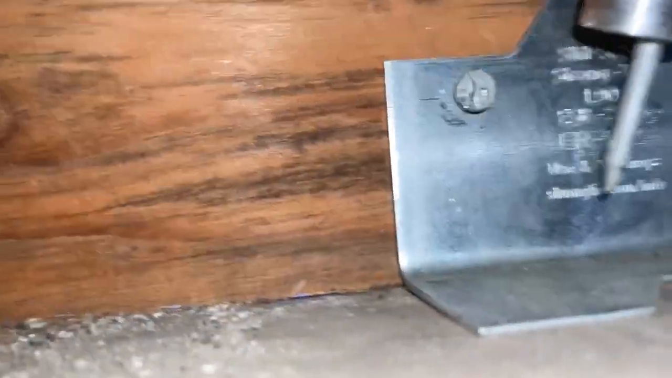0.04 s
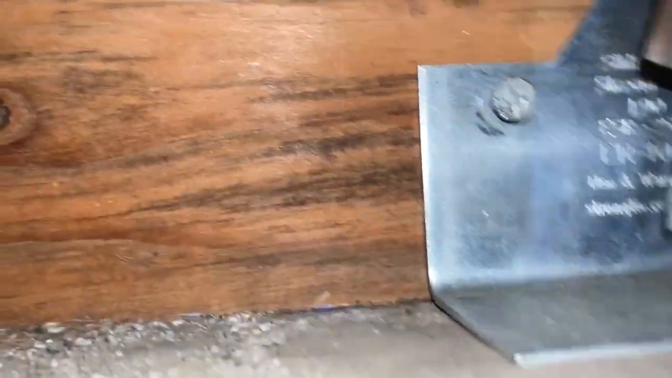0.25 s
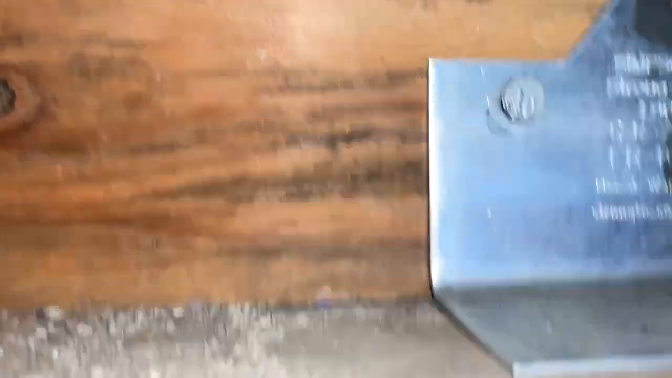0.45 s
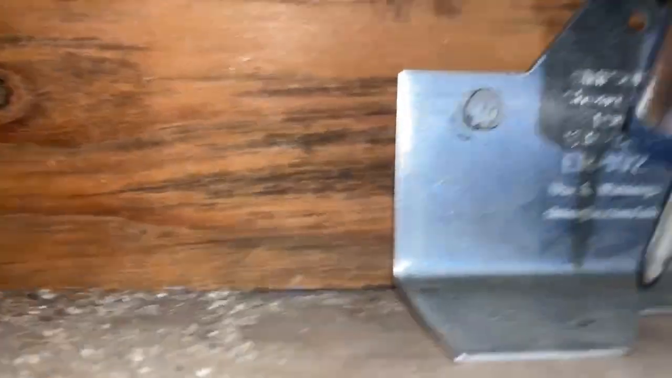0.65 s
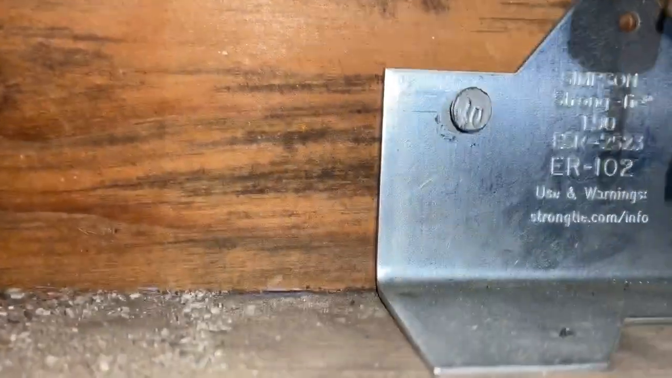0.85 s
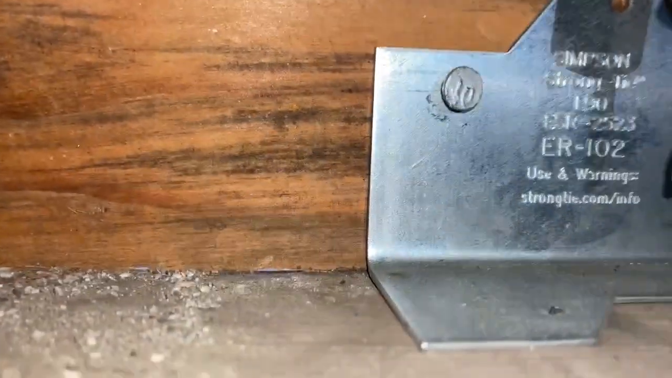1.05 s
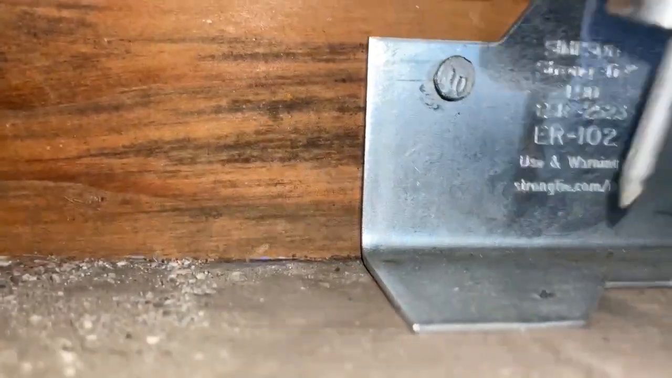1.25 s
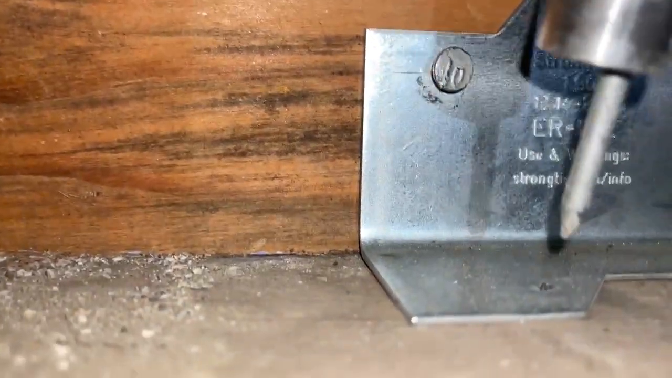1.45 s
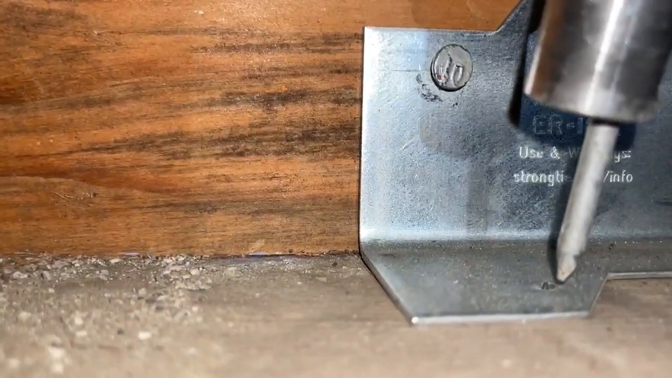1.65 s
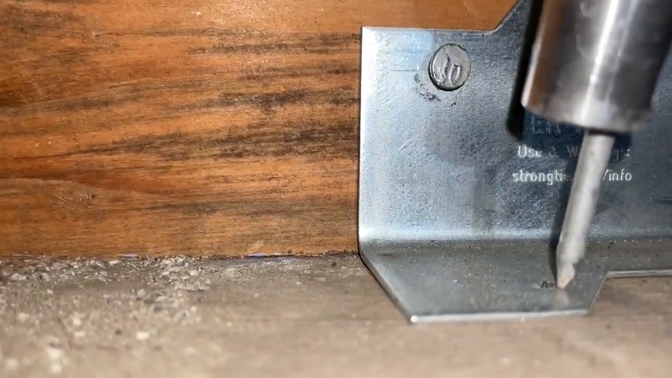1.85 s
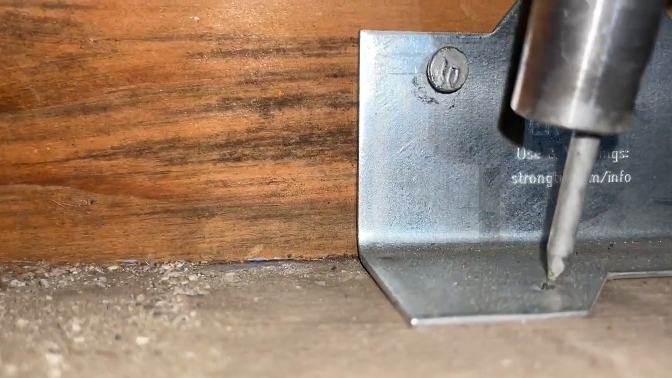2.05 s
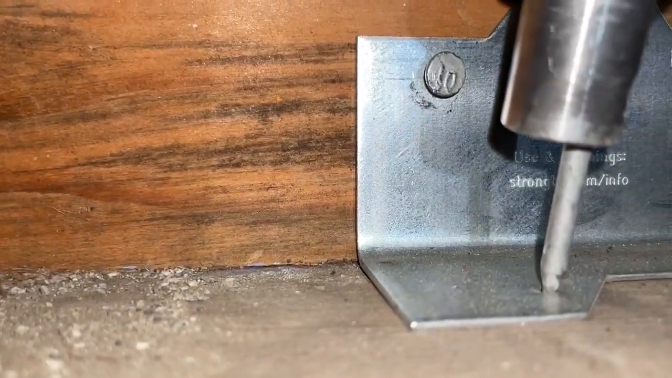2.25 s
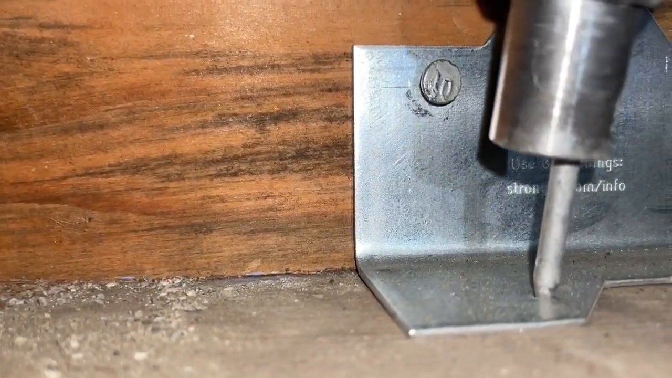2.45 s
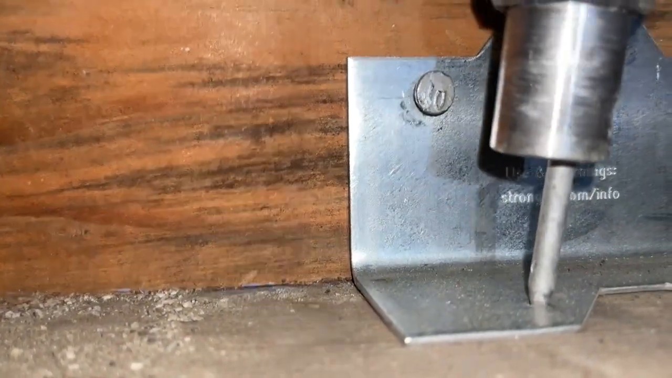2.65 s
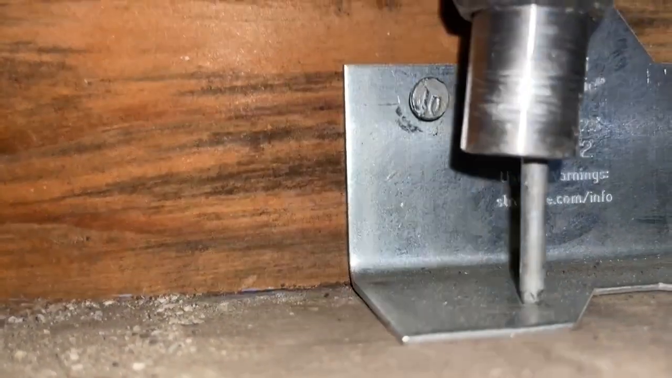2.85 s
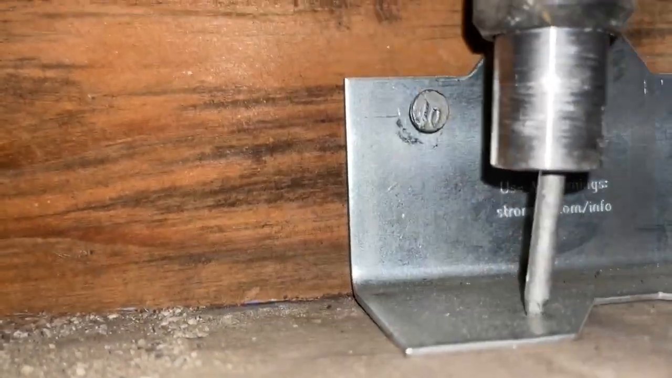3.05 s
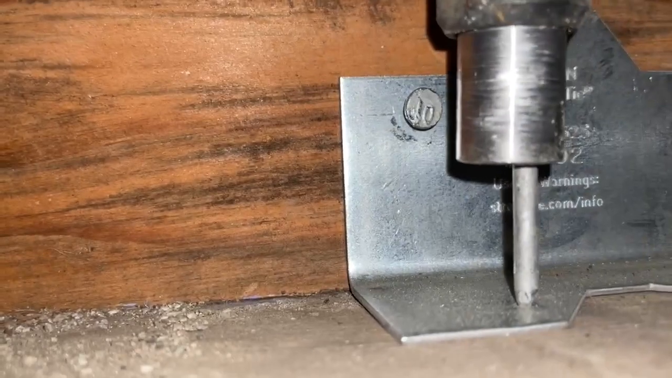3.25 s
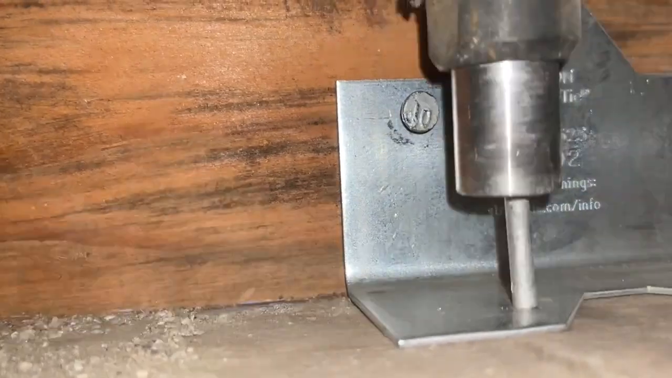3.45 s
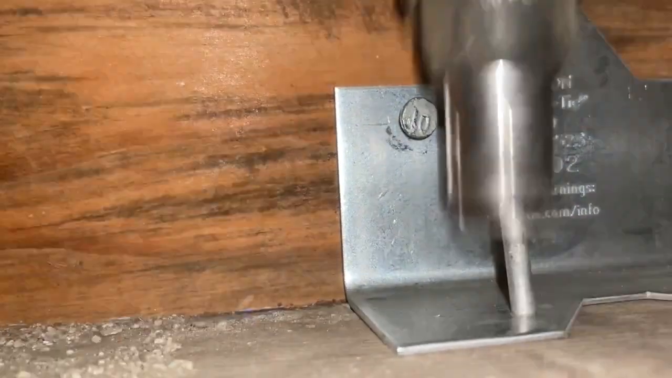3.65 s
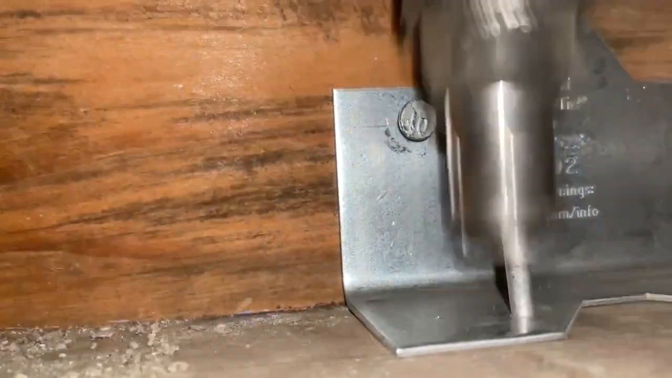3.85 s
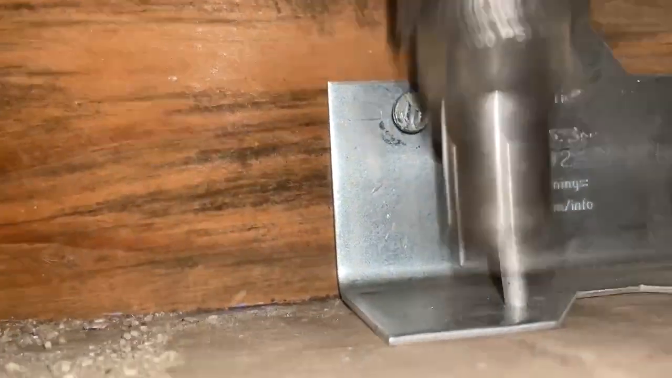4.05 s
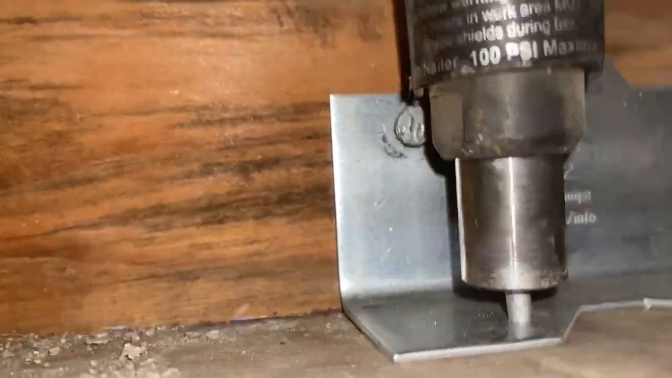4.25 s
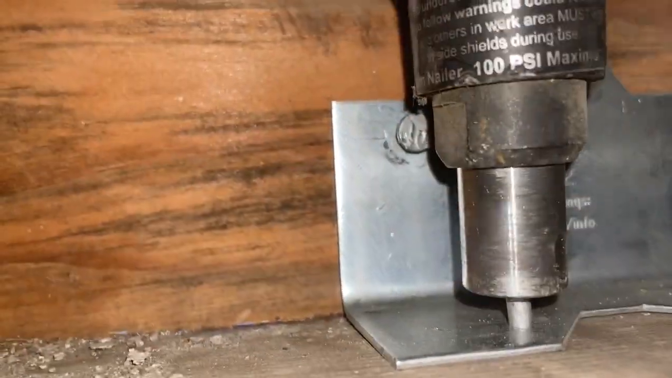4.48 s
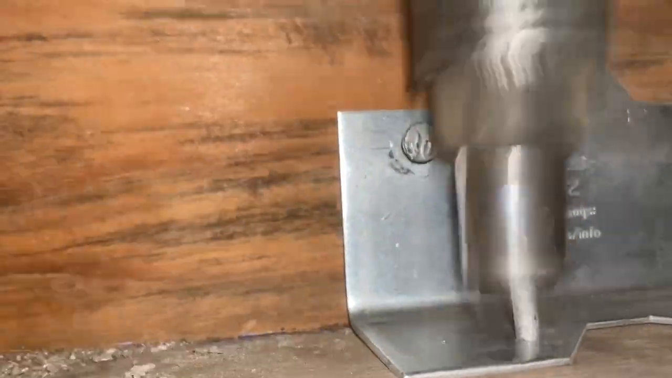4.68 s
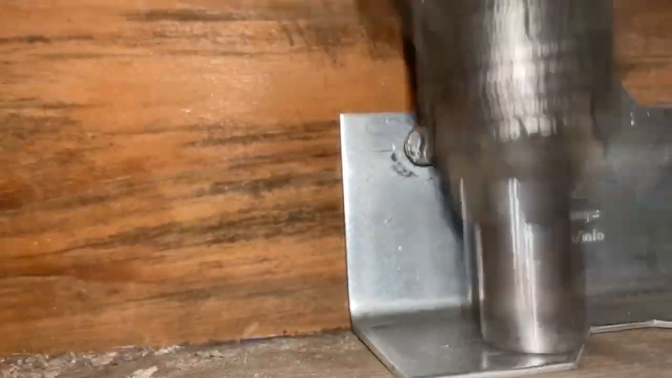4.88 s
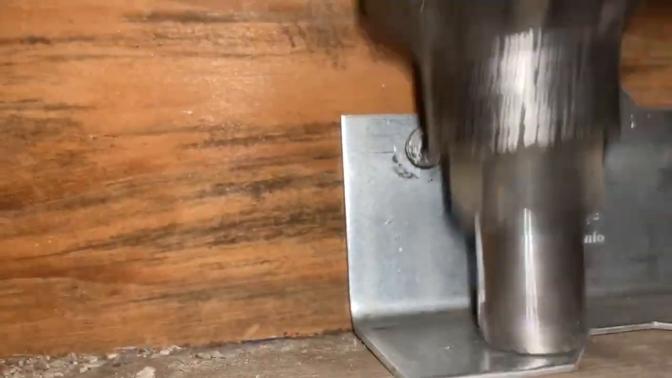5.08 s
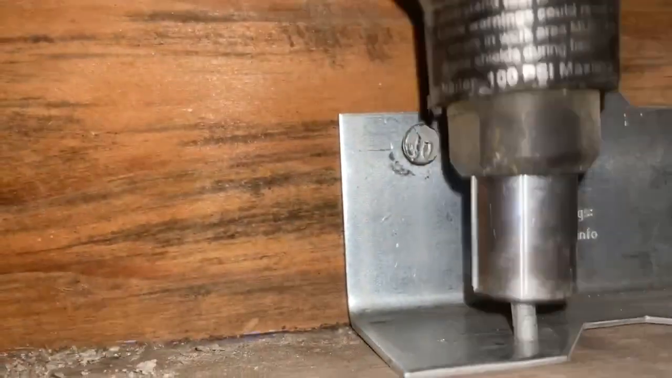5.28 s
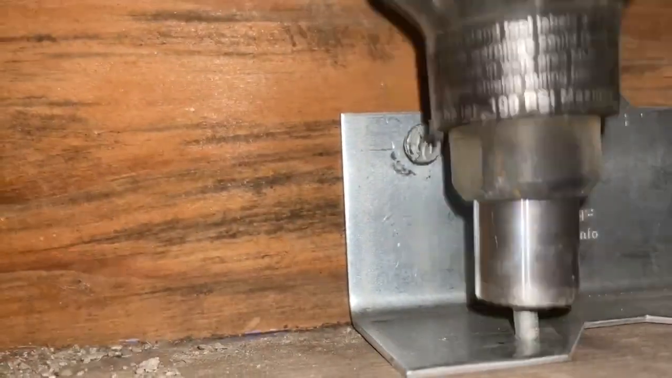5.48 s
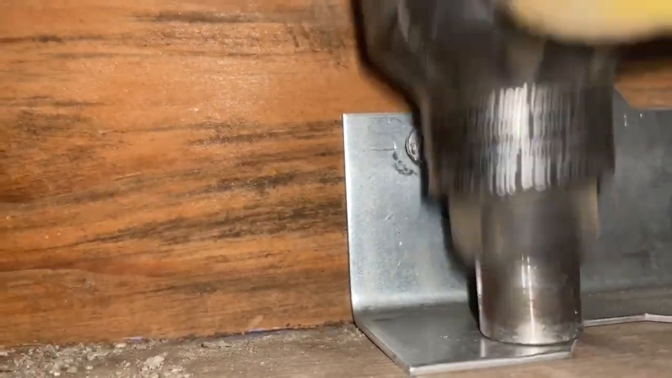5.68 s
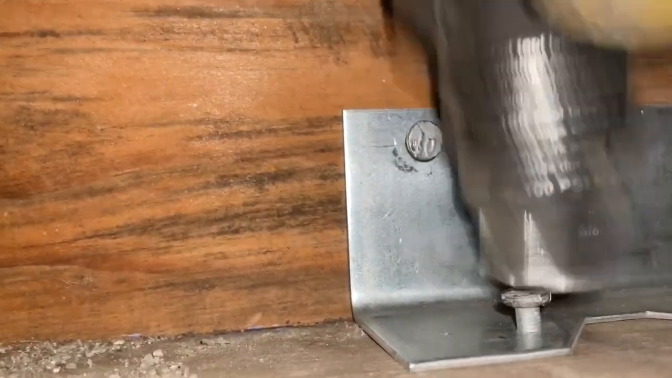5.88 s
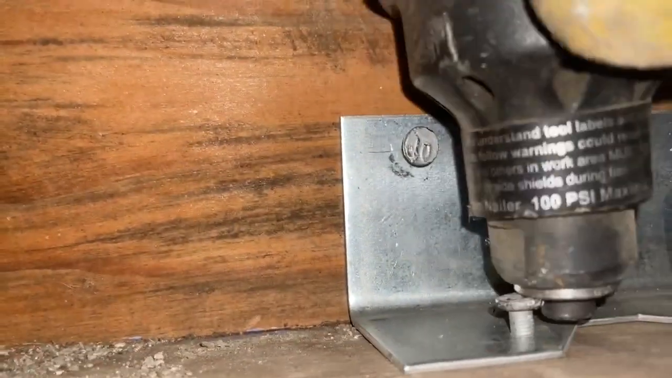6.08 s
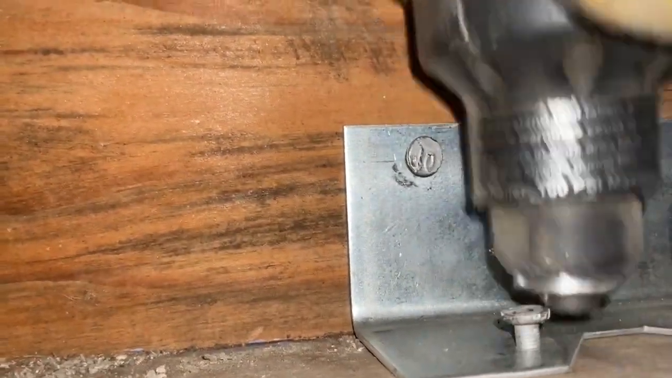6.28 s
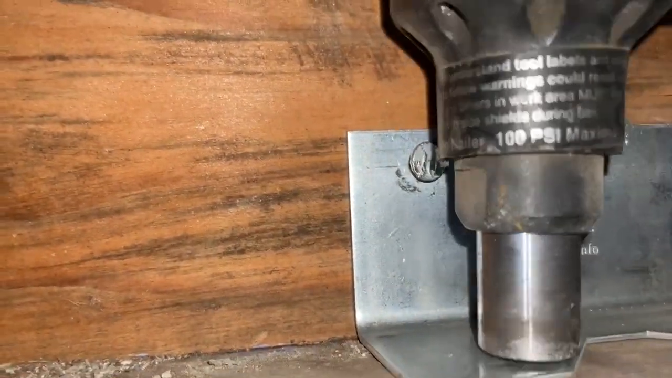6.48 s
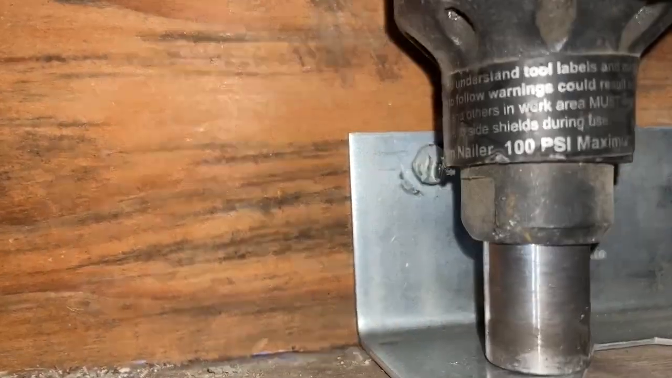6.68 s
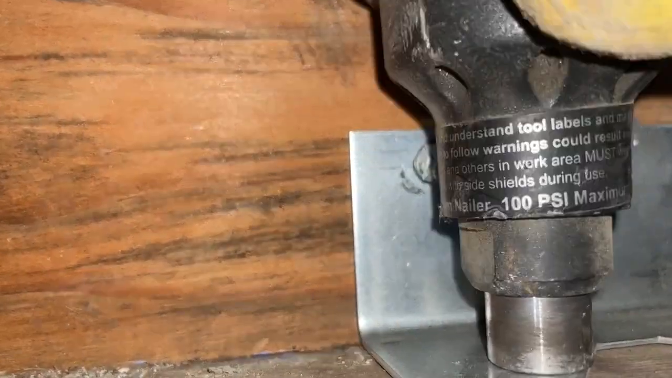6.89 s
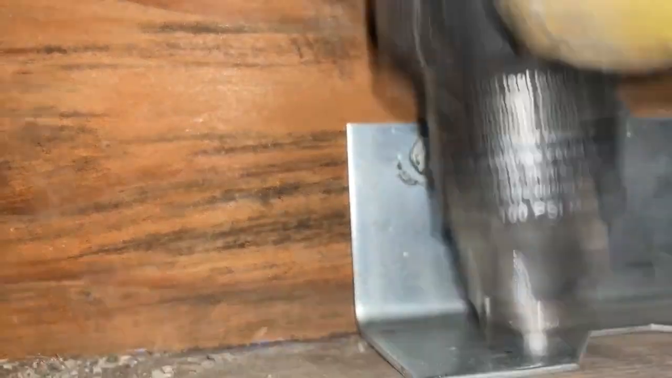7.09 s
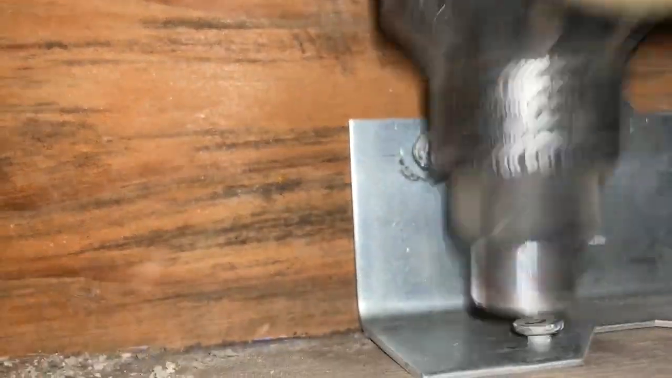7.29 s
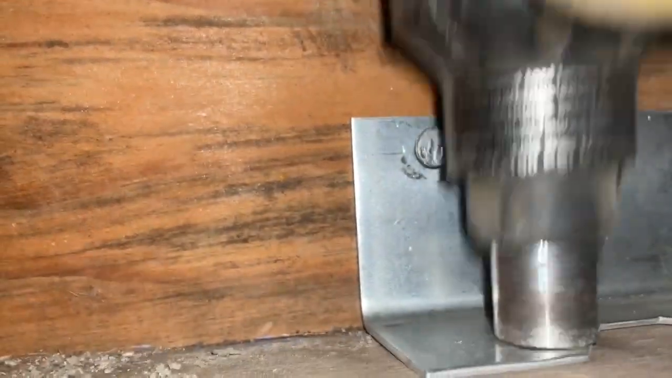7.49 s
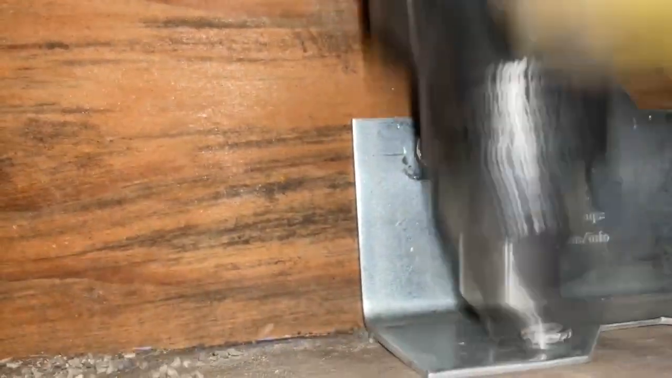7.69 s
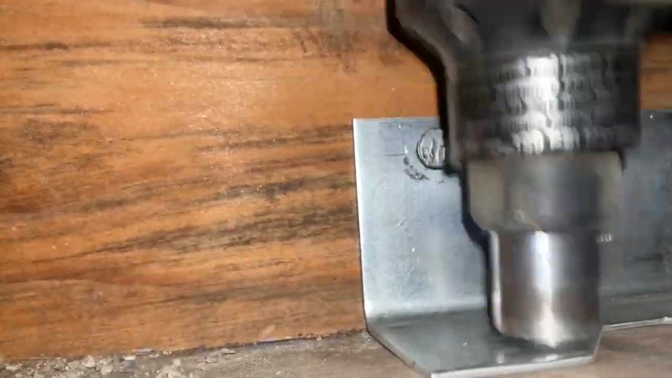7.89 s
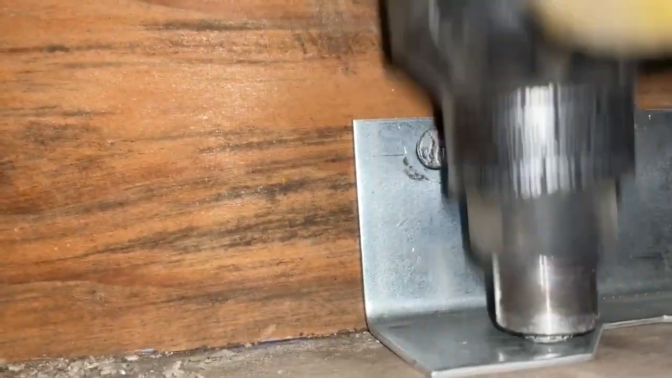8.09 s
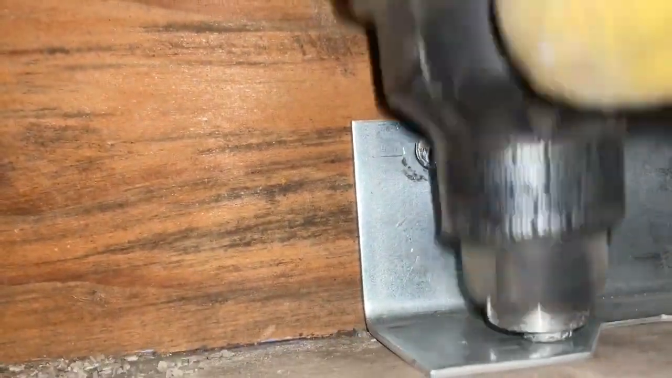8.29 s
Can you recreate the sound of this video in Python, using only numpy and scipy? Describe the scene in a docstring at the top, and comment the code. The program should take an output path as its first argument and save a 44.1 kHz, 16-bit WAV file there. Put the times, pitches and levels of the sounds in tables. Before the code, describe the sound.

A palm-held air hammer drives a nail through a steel bracket into wood, rattling in harsh bursts, with small metallic clinks between them.

```python
"""Palm nailer in a crawlspace

An air-driven palm nailer hammers a nail through a steel bracket into a joist, in three bursts, in a low crawlspace.
Around each stroke a valve ticks, the piston rings the steel and thumps the joist, and air exhausts as shaped noise;
after many strokes the tool thuds back. The close microphones overload. Before the first and last bursts, nail and
nose tap and scrape the bracket as rough forces on damped modes, over filtered-noise handling rumble, rubbing and hiss.
"""
import sys
import numpy as np
from scipy import signal
from scipy.fft import rfft, irfft, next_fast_len
from scipy.io import wavfile
from scipy.ndimage import uniform_filter1d

SR = 44100
rng = np.random.default_rng(int(sys.argv[2]) if len(sys.argv) > 2 else 0)


def wrap_up_sound(samples):
    """Save the sound to the file named by the first command line argument, as 16-bit audio."""
    columns = np.atleast_2d(samples).T
    # keep every value between -1 and 1, then stretch to whole-number steps
    tamed = np.clip(columns, -1, 1)
    steps = np.round(tamed * 32767).astype(np.int16)
    wavfile.write(sys.argv[1], SR, steps)


N = 367353

# Piston blows, each announced by a valve tick.
# Each row: nominal time in s, relative steel level in dB, lead of the tick in s, relative tick level in dB.
BLOWS = [(3.38, -10.5, .005, -15), (3.473, -18, .008, -19), (3.547, -25.5, .008, -32),
         (3.648, -17, .026, -10.5), (3.741, -22, .015, -7.5), (3.844, -17.5, .021, -11),
         (3.945, -16.5, .017, -10), (4.037, -16.5, .018, -10.5), (4.525, -14.5, .01, -38),
         (4.614, -11.5, .015, -6), (4.681, -14.5, .006, -28.5), (4.755, -11, .009, -8),
         (4.804, -15.5, .006, -22), (4.884, -14, .016, -9), (4.96, -11.5, .011, -9),
         (5.018, -15, .011, -12), (5.092, -15.5, .012, -6.5), (5.164, -16.5, .016, -9.5),
         (5.243, -17.5, .015, -5.5), (5.319, -11.5, .012, -8), (5.386, -13, .014, -8),
         (5.467, -13, .016, -9.5), (5.546, -17, .014, -10), (5.624, -14.5, .017, -13.5),
         (5.703, -12.5, .016, -15), (5.796, -12, .019, -14.5), (5.885, -12.5, .014, -13.5),
         (6.987, -14, .015, -34.5), (7.086, -15.5, .019, -11), (7.182, -13, .016, -10.5),
         (7.267, -16.5, .01, -12), (7.346, -16, .012, -7), (7.428, -11.5, .013, -7.5),
         (7.517, -12, .015, -11.5), (7.602, -9.5, .015, -8.5), (7.697, -8.5, .019, -11.5),
         (7.782, -10.5, .009, -14.5), (7.862, -9.5, .013, -12.5), (7.945, -8.5, .011, -5),
         (8.033, -11.5, .016, -9.5), (8.122, -9, .013, -15), (8.209, -10, .012, -15),
         (8.294, -10.5, .014, -12.5)]
# Modes of the bracket and tool when free to ring. Each row: frequency in Hz, relative level in dB, t60 in s.
STEEL_MODES = [(1027, -3.5, 0.015), (1255, -5.5, 0.013), (1620, -4.5, 0.03), (1654.5, 1, 0.017),
               (1927, -7.5, .025), (2090, -8.5, 0.03), (2695, -6, .012), (3100, -10.5, 0.019),
               (3463, -10, 0.021), (3884, -12, .025), (4540, -14, 0.016), (5180, -8.5, .015),
               (5996, -11.5, .01), (6930, -8.5, .012), (7380, -13.5, .012), (9800, -9, .008),
               (10500, -21, .008), (11800, -15, 0.008), (12600, -20, 0.007), (14100, -20, .006),
               (15400, -18, .006)]
# Modes of the joist when free to ring. Each row: frequency in Hz, relative level in dB, t60 in s.
JOIST_MODES = [(59, -15, .12), (100, -13.5, 0.068), (130, -4, 0.093), (177.4, -1.5, 0.044),
               (245, -2, 0.026), (320, -6.5, 0.019), (410, -9, 0.051), (468.6, -4.5, .065),
               (537, -5.5, 0.014), (605, -4.5, 0.034), (760, -8, 0.018), (925, -9.5, 0.067)]


def steel():
    """The piston's rough force on the nail head rings the steel, with one rebound; ticks are lighter contacts."""
    s, db = np.transpose(BLOWS)[:2]
    rebound_s = rng.uniform(.008, .0081, len(s))
    blow = strike(s - .0015, db + 12.5, STEEL_MODES, contact_s=.002, spread_db=2.5)
    rebound = strike(s + rebound_s, db - 2, STEEL_MODES, contact_s=.0008, spread_db=5.5, tilt_db=4.5)
    tick_s, tick_db, tilt = ticks()
    tick = strike(tick_s - .001, tick_db + .5, STEEL_MODES, contact_s=.0011, spread_db=2.5, tilt_db=tilt)
    return blow + rebound + tick


def ticks(valve_tilt_db=.7, bounce_tilt_db=2.8):
    """Light contacts around the blows, valve and nose bounce: times in s, relative dB, treble tilts in dB per octave."""
    # The nose bounces on the nail head, and a few times the valve ticks with no blow after it. Each row:
    # nominal time in s, relative level in dB.
    bounces = [(3.512, -21.5), (4.123, -11), (4.657, -18.5), (4.876, -16), (5.349, -32), (5.789, -19),
               (5.967, -15), (7.01, -22), (7.118, -16), (7.147, -14.5), (7.174, -19), (7.209, -17.5),
               (7.246, -15.5), (7.295, -15), (7.315, -15.5), (7.383, -14.5), (7.392, -12), (7.465, -12.5),
               (7.511, -18), (7.554, -13.5), (7.628, -24.5), (7.735, -23), (7.822, -25), (7.896, -26.5),
               (7.906, -24.5), (7.983, -22), (8.237, -26.5)]
    s, _, lead, valve_db = np.transpose(BLOWS)
    bounce_s, bounce_db = np.transpose(bounces)
    tilt = np.r_[np.full(len(s), valve_tilt_db), np.full(len(bounce_s), bounce_tilt_db)]
    return np.r_[s - lead, bounce_s], np.r_[valve_db, bounce_db], tilt


def joist(spread=.115, power=.3, first_hz=1500, echo_s=.005356, echo_db=-7):
    """Bending waves arrive high pitches first (delay = spread / Hz ** power), echo off a support, leave modes ringing."""
    # Bending pulse sent along the joist. Each row: frequency in Hz, relative level in dB.
    bending = [(40, -7), (90, -1), (180, 0.5), (400, 0), (800, -3.5), (1500, -7.5), (2300, -18),
               (4000, -51)]
    s = np.transpose(BLOWS)[0]
    db = thump_db(s)
    f = np.arange(1, 2050) * SR / 4096
    hz, shape_db = np.transpose(bending)
    shape = amp(np.interp(np.log(f), np.log(hz), shape_db))
    out = strike(s + .005, db + 8.5, JOIST_MODES, contact_s=.003, spread_db=2.0)
    for at, level_db, (stretch, wobble, turn) in zip(s, db, rng.random((len(s), 3))):
        c = spread * (.85 + .3016 * stretch)
        # the phase whose slope over frequency is the delay
        sweep = np.exp(-2j * np.pi * (c * f ** (1 - power) / (1 - power) - turn))
        delay_s = echo_s * (.8344 + .3 * wobble)
        echo = 1 + amp(echo_db) * np.exp(-2j * np.pi * f * delay_s)
        pulse = amp(level_db + 43.5) * irfft(shape * sweep * echo)
        # start early enough for first_hz to arrive at the blow
        start = int((at - c / first_hz ** power) * SR)
        out[start:start + len(pulse)] += pulse[:N - start]
    return out


def thump_db(s):
    """Relative joist level in dB at time s: less as the nail seats, stronger again at the last burst."""
    # Each row: time in s, relative level in dB.
    thump = [(3.38, -6), (3.47, -10.5), (4.7, -11.5), (5.9, -17), (6.98, -12.5), (7.6, -12.5), (7.95, -16),
             (8.3, -16)]
    return np.interp(s, *np.transpose(thump))


def air(charge_db=-20.5, rough_db=5.5, tail_hz=3000):
    """Air fills the cylinder just before the blow, bursts out with it and again as the piston returns."""
    # Exhaust noise. Each row: frequency in Hz, relative density in dB per Hz.
    exhaust = [(410, -31.5), (700, -5.5), (1050, -4.5), (1390, -17), (1880, -1), (2350, -12), (6130, -11.5),
               (6990, -5), (8620, -22.5), (11100, -8), (13100, -29), (15200, -13.5), (16200, -29.5)]
    s = np.transpose(BLOWS)[0]
    tick_s, tick_db = ticks()[:2]
    jet = noise(exhaust, alike=.81)
    # the same charge of air every stroke
    flow = swell(spikes(s, amp(charge_db + 17.5)), .0017, .04)
    flow += swell(spikes(s + .0083, amp(charge_db + 7.5)), .00086, .013)
    flow += swell(spikes(tick_s - .0015, amp(tick_db - 10)), .0019, .025)
    slow = swell(spikes(s - .008, amp(charge_db + 6)), .0097, .06)
    slow += swell(spikes(s, amp(charge_db - 14)), .003, .12)
    # slower air is duller and comes in eddies a few milliseconds long
    eddies = np.repeat(rng.standard_normal(N // 128 + 1), 128)[:N]
    slow *= amp(rough_db * uniform_filter1d(eddies, size=64))
    dull_jet = signal.lfilter(*signal.butter(1, tail_hz, fs=SR), jet)
    return flow * jet + slow * dull_jet


def gusts(delay_s=.0038):
    """The exhaust puff reaches each microphone port as its own lump of low pressure noise."""
    s = np.transpose(BLOWS)[0]
    low_band = signal.butter(2, [45, 300], "band", fs=SR, output="sos")
    lumps = signal.sosfilt(low_band, rng.standard_normal((2, N)))
    return swell(spikes(s + delay_s, amp(thump_db(s) + 16.5)), .005, .076) * lumps


def thuds(hz=75, t60=.06, soft_hz=160):
    """The tool falls back on the nail: a soft contact, a low swing that starts with a dip and is quickly damped."""
    # Each row: nominal time in s, relative level in dB.
    falls = [(3.428, -15.5), (3.51, -13), (3.603, -13), (3.889, -9), (3.989, -7.5), (4.079, -14.5),
             (4.786, -27), (4.853, -13), (4.922, -29), (5.01, -20.5), (5.144, -21.5), (5.282, -22.0),
             (5.362, -18), (5.502, -32.5), (5.579, -39), (5.837, -25), (5.927, -32), (7.023, -21.5),
             (7.129, -19.5), (7.393, -15.5), (7.476, -14.5), (7.576, -11.5), (7.643, -13), (7.684, -19),
             (7.745, -25), (7.813, -27), (7.838, -14), (7.908, -19), (8.002, -16), (8.085, -19),
             (8.181, -17.5), (8.262, -24)]
    s, db = np.transpose(falls)
    soft = signal.butter(2, soft_hz, fs=SR, output="sos")
    return -signal.sosfilt(soft, ring(spikes(s - .0075, amp(db + 10)), hz, t60))


def handling(knee_hz=1700, grains_per_s=700):
    """Taps and scrapes on the bracket; the pressed tool deadens high rings most, a sliding point all of them."""
    # Nail and nose touch and scuff the bracket.
    # Each row: time in s, relative level in dB, treble tilt in dB per octave, strongest ring in Hz.
    taps = [(0.059, -46.5, 1, 877), (0.174, -44, -7, 872), (0.445, -49, -1.5, 740), (0.529, -55, 4, 2010),
            (0.543, -53.5, 7.5, 2040), (0.829, -45, -1, 750), (0.864, -52, 0.5, 756), (1.232, -58, 8, 6980),
            (1.321, -59.5, 6, 6580), (1.629, -64, 7, 1950), (1.839, -44.5, 4, 790), (1.893, -46.5, 2, 818),
            (1.952, -57.5, 6.5, 2160), (1.998, -25.5, 1.5, 740), (2.082, -50, 7, 818),
            (2.389, -40.5, 0.5, 918), (2.456, -48, 2, 606), (2.614, -57, 5, 6850),
            (2.715, -39.5, 6.5, 1680), (2.873, -47, 2.5, 856), (2.903, -40, 3.5, 778),
            (3.118, -42.5, 2.5, 1800), (3.277, -51, 4.5, 3330), (6.13, -53, 2, 1680), (6.281, -42, 1, 1760),
            (6.297, -16, 3.5, 1880), (6.34, -51, -0.5, 4540), (6.399, -24.5, 6.5, 1880),
            (6.418, -33, 7, 1130), (6.51, -57.5, 2, 673), (6.536, -35.5, 0.5, 870), (6.719, -62, 1.5, 920),
            (6.791, -20.5, 1, 1630)]
    # The nail point or nose slides over the steel.
    # Each row: start in s, length in s, relative level in dB, treble tilt in dB per octave.
    scrapes = [(.6, .12, -78.5, 3.5), (2.004, .08, -71.5, 1.5), (2.603, 0.03, -74.5, 6),
               (2.908, 0.042, -69.5, 1.5), (3.119, .08, -69, 0), (6.286, .025, -54, 2),
               (6.314, 0.034, -59, 4.5), (6.416, .02, -60.5, 3.5), (6.523, 0.018, -77.5, -1.5),
               (6.745, .05, -74.5, -2.5)]
    modes = JOIST_MODES[6:] + STEEL_MODES
    held = [(hz, db, t60 * min(.9, knee_hz / hz + .15)) for hz, db, t60 in modes]
    rubbed = [(hz, db, t60 * .3) for hz, db, t60 in modes]
    s, db, tilt, peak_hz = np.transpose(taps)
    out = strike(s, db - 5.5, held, contact_s=.00033, spread_db=3.0, tilt_db=tilt, peak_hz=peak_hz, peak_db=7)
    out += strike(s, db - 19, rubbed, contact_s=.006, spread_db=2.5, tilt_db=tilt)
    # a stroke swells and fades: grains are strongest in its middle
    grains = []
    for start, length, level_db, tilt in scrapes:
        for u, extra in rng.random((int(length * grains_per_s) + 2, 2)):
            grain_db = level_db + 8 * np.sin(np.pi * u) + 4 * extra
            grains.append((start + length * u, grain_db, tilt))
    s, db, tilt = np.transpose(grains)
    return out + strike(s, db + 3, rubbed, contact_s=.0012, spread_db=1.0, tilt_db=tilt)


def background(rise_db_per_s=280, left_db=3):
    """Handling rumble with bumps, cloth and glove rubbing, and air leaking at the valve, all as coloured noise."""
    # Each row: time in s, then rumble, rubbing and air leak levels in dB.
    bed = [(0, -50, -61, -76), (.36, -56, -59, -77), (.5, -57, -73, -75), (.72, -59, -63, -77),
           (.97, -55, -78, -76), (1.09, -62, -69, -75), (1.43, -65, -90, -76), (1.9, -58, -85, -76),
           (2.05, -58, -75, -76), (2.85, -60, -70, -72), (3.2, -50, -64, -66), (3.35, -45, -62, -65),
           (3.38, -31, -42, -50), (4.17, -30, -78, -88), (4.23, -64, -78, -88), (4.45, -68, -83, -87),
           (4.52, -31, -43, -92), (6, -49.5, -74, -97), (6.13, -84, -76, -98), (6.55, -89, -90, -97),
           (6.9, -84, -86, -97), (6.97, -67, -62, -100)]
    # Hands and tool bump the joist, a low rumble that swells and fades.
    # Each row: peak time in s, level in dB, fade in s per 20 dB.
    bumps = [(.39, -48, .15), (.63, -53, .15), (.82, -37.5, .4), (.9, -34, .08), (1.07, -46, .15),
             (1.49, -37, .1), (1.58, -46, .2), (1.75, -52, .15), (1.9, -50, .1), (2.175, -39, .07),
             (2.28, -37, .06), (2.99, -30, .2), (3.19, -40.5, .15), (4.26, -58.5, .15), (6.162, -72, .05),
             (6.302, -65, .08), (6.414, -74, .05), (6.798, -61.5, .04), (6.892, -67, .1)]
    # Noise colours. Each row of the three: frequency in Hz, relative density in dB per Hz.
    rumble_spectrum = [(12, -46), (20, -17), (76, 3.5), (130, -9.5), (157, -20), (258, -16), (300, -32.5),
                       (500, -40), (650, -57.5), (1100, -120)]
    rub_spectrum = [(180, -40), (300, -4), (342, -10), (396, 1.5), (550, -16.5), (884, -8.5), (1140, -24.5),
                    (1710, -10.5), (2000, -23.5), (2410, -16.5), (2890, -28), (3820, -25), (5980, -38.5),
                    (7000, -21.5), (9100, -58.5), (15400, -120)]
    leak_spectrum = [(2940, -32), (5000, -10.5), (7520, -7.5), (8760, -14.5), (9390, -7.5), (10500, 1),
                     (12000, -7.5), (13200, -24), (15100, -3), (16200, -14)]
    t = np.arange(N) / SR
    s, *columns = np.transpose(bed)
    rumble, rub, leak = (amp(np.interp(t, s, column)) for column in columns)
    for at, db, fade in bumps:
        drop_db = np.maximum(20 * (t - at) / fade, rise_db_per_s * (at - t))
        rumble = np.maximum(rumble, amp(db - drop_db))
    # the hands work left of the microphones
    sides = amp(left_db * np.array([[.5], [-.5]]))
    out = sides * rumble * noise(rumble_spectrum, alike=.75)
    out += rub * noise(rub_spectrum, alike=.13)
    return out + leak * noise(leak_spectrum, alike=.64)


def crawlspace(x, t60=.09, low_hz=120, dull_hz=3000):
    """Dense short reflections as decaying band-limited noise, unrelated at the two ports."""
    t = np.arange(SR // 4) / SR
    tail = rng.standard_normal((2, len(t))) * amp(-60 * t / t60) * (t > .002)
    tail = signal.lfilter(*signal.butter(1, [low_hz, dull_hz], "band", fs=SR), tail)
    tail /= np.sqrt(np.sum(tail ** 2, axis=1, keepdims=True))
    return signal.fftconvolve(x[None], tail, axes=1)[:, :N]


def ports(x):
    """The two microphone ports hear a near source with different phase and level."""
    # Each row: frequency in Hz, phase in radians by which left leads right.
    lead = [(0, 1), (600, -1.43), (1550, 1.5), (2070, 2), (3190, 1), (5170, 1.64), (6200, 2), (7240, 2.45),
            (10500, -6), (11700, 0), (12300, 4), (13500, 35.5), (14600, 17.5), (15900, 5.5)]
    # Each row: frequency in Hz, left minus right in dB.
    balance = [(60, 1), (110, 2), (200, -2.5), (380, 3.5), (700, -5), (1290, -4.5), (2380, 2.5),
               (4400, -1.5), (8120, -1.0), (15000, 1)]
    side = np.array([[.5], [-.5]])

    def response(f):
        """Half of each difference goes to either port."""
        turn = np.exp(1j * side * np.interp(f, *np.transpose(lead)))
        return turn * amp(side * np.interp(f, *np.transpose(balance)))

    return shaped(x, response)


def strike(s, db, modes, contact_s, spread_db, tilt_db=0, peak_hz=1000, peak_db=0):
    """A contact is a short rough force; it drives every mode by its own random strength, plus peak_db near peak_hz."""
    luck = rng.normal(0, 1, (len(s), len(modes)))
    rough, out = rng.standard_normal(N), np.zeros(N)
    t = np.arange(SR // 20) / SR
    span = np.clip(np.reshape(contact_s, (-1, 1)), 1 / SR, None)
    shape = t / span * np.exp(-t / span) / np.sqrt(span * SR)
    at = np.minimum((np.asarray(s) * SR).astype(int)[:, None] + np.arange(len(t)), N - 1)
    for k, (hz, mode_db, t60) in enumerate(modes):
        near_peak = np.exp(-(np.log2(hz / peak_hz) / .4) ** 2)
        colour_db = tilt_db * np.log2(hz / 1000) + peak_db * near_peak
        level = amp(db + mode_db + spread_db * luck[:, k] + colour_db)
        force = np.full(N, 1e-18)
        np.add.at(force, at, level[:, None] * shape)
        # each mode meets another stretch of the roughness
        out += ring(force * np.roll(rough, 997 * k), hz, t60)
    return out


def ring(clicks, hz, t60):
    """A two-pole resonator: a unit click starts a decaying sine of height 1."""
    r, w = amp(-60 / (t60 * SR)), 2 * np.pi * hz / SR
    return signal.lfilter([0, np.sin(w)], [1, -2 * r * np.cos(w), r * r], clicks)


def swell(clicks, rise_s, t60):
    """Each click becomes an envelope that rises, then dies away."""
    a, r = np.exp(-1 / (rise_s * SR)), amp(-60 / (t60 * SR))
    decay = signal.lfilter([1], [1, -r], clicks)
    return signal.lfilter([1 - a], [1, -a], decay)


def spikes(s, sizes):
    """A click train with the given sizes at the given times."""
    out = np.zeros(N)
    np.add.at(out, np.clip((np.asarray(s) * SR).astype(int), 0, N - 1), sizes)
    return out + 1e-18


def noise(spectrum, alike):
    """Stereo noise of a given colour and left-right likeness; rms 1."""
    hz, db = np.transpose(spectrum)
    white = rng.standard_normal((2, N))
    mid, side = shaped(white, lambda f: amp(np.interp(np.log(f), np.log(hz), db, -90, -90)))
    alike = np.clip(alike, 0, 1)
    out = np.sqrt(1 + alike) * mid + np.sqrt(1 - alike) * side * [[1], [-1]]
    return out / np.sqrt(np.mean(out ** 2))


def shaped(x, response):
    """Filter by a complex response given as a function of frequency."""
    size = next_fast_len(N + SR // 4)
    f = np.arange(1, size // 2 + 2) * SR / size
    return irfft(rfft(x, size) * response(f), size)[..., :N]


def amp(db):
    """dB to gain."""
    return 10 ** (np.asarray(db) / 20)


def scene():
    """All sources at the microphones."""
    struck = steel() + handling() + joist() + thuds()
    near = ports(struck + air())
    return near + amp(-11) * crawlspace(struck) + gusts() + background()


def record(dry, bass_cut_hz=45, top_cut_hz=16300):
    """The input overloads at full scale; the deepest bass and the top of the band are cut."""
    bass_cut = signal.butter(2, bass_cut_hz, "high", fs=SR, output="sos")
    top_cut = signal.cheby2(12, 50, top_cut_hz, fs=SR, output="sos")
    overloaded = np.clip(dry, -1, 1)
    return np.clip(signal.sosfilt(top_cut, signal.sosfilt(bass_cut, overloaded)), -1, 1)


dry = scene()
out = record(dry)
wrap_up_sound(out)
```